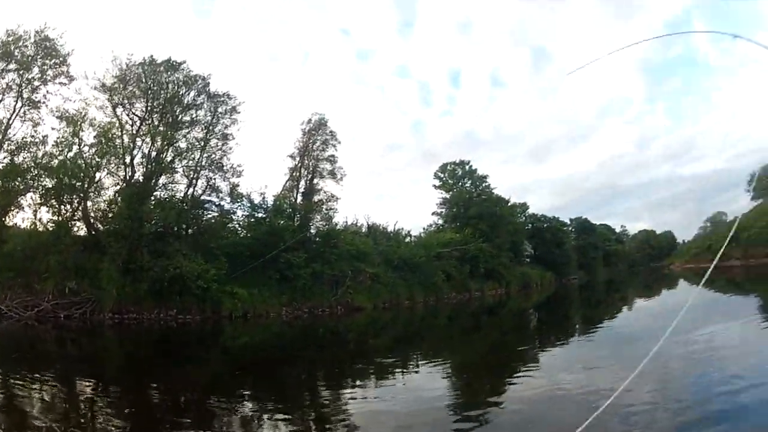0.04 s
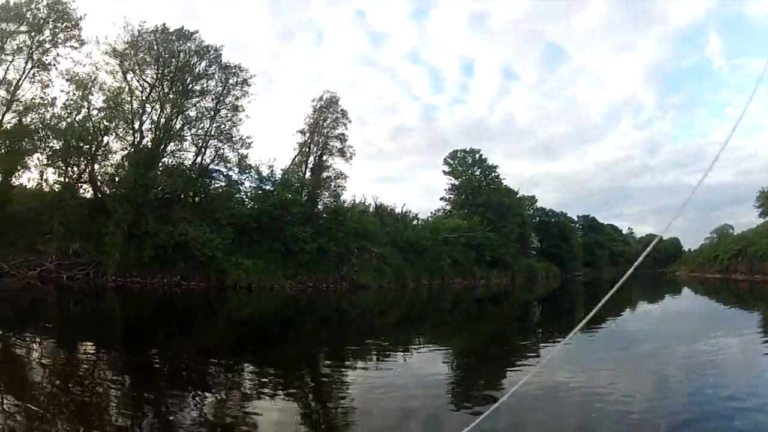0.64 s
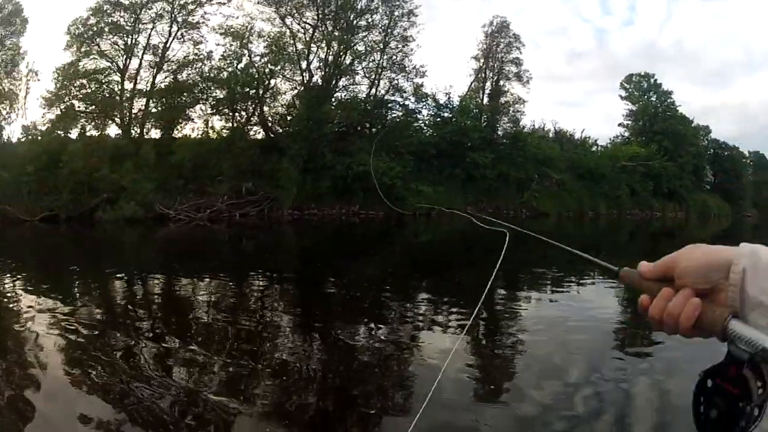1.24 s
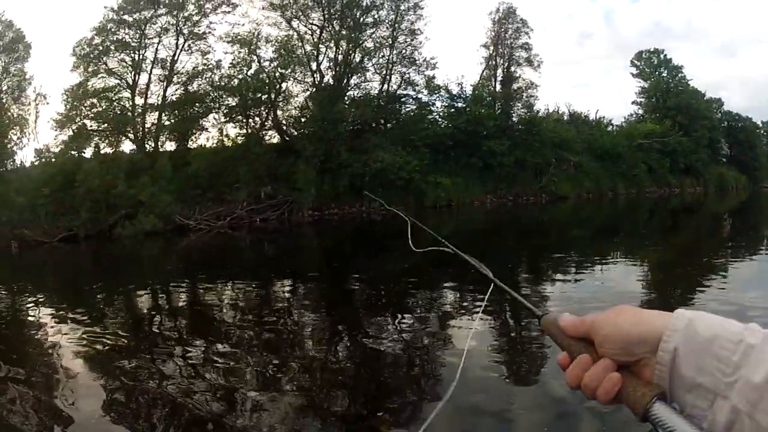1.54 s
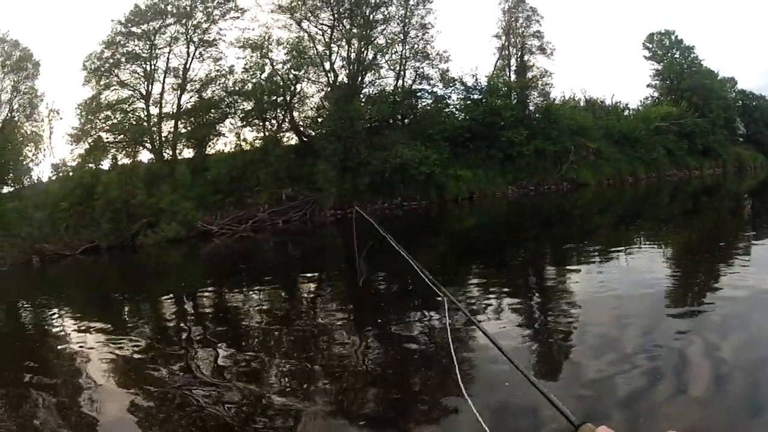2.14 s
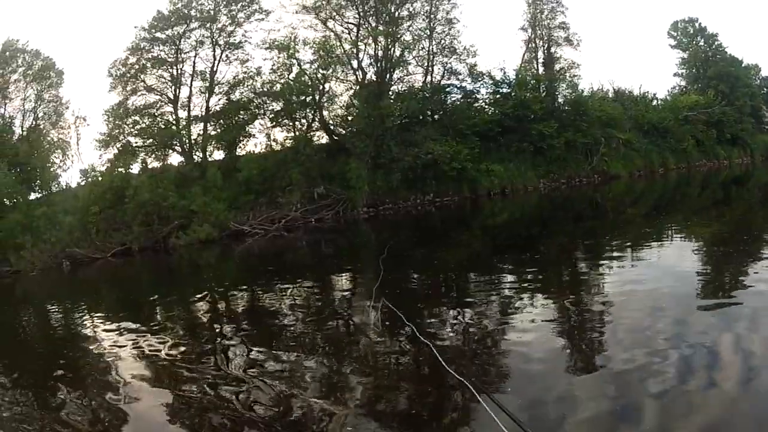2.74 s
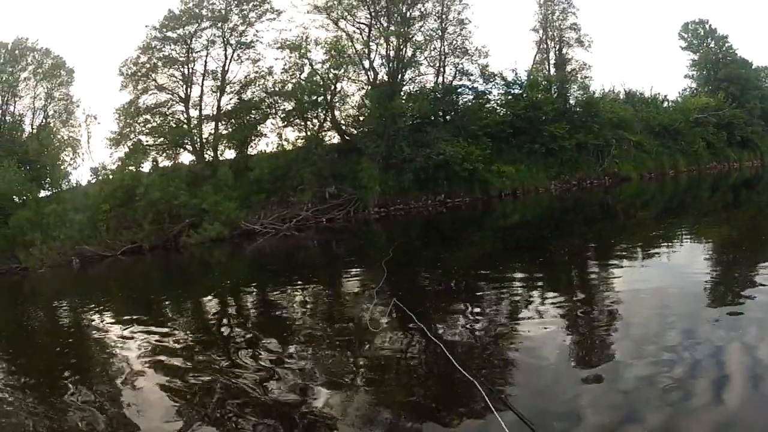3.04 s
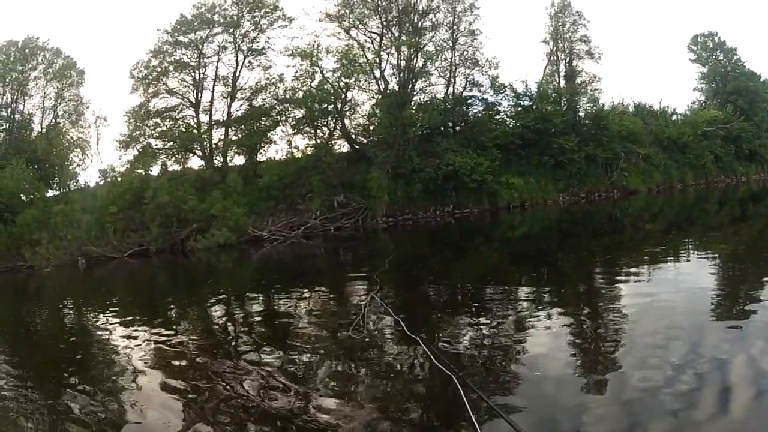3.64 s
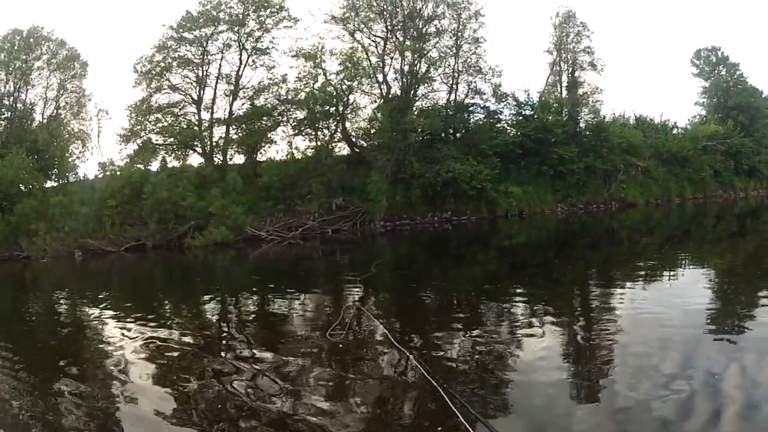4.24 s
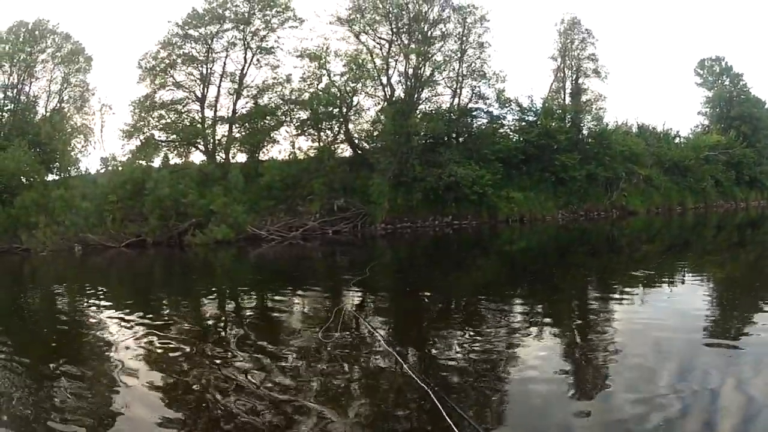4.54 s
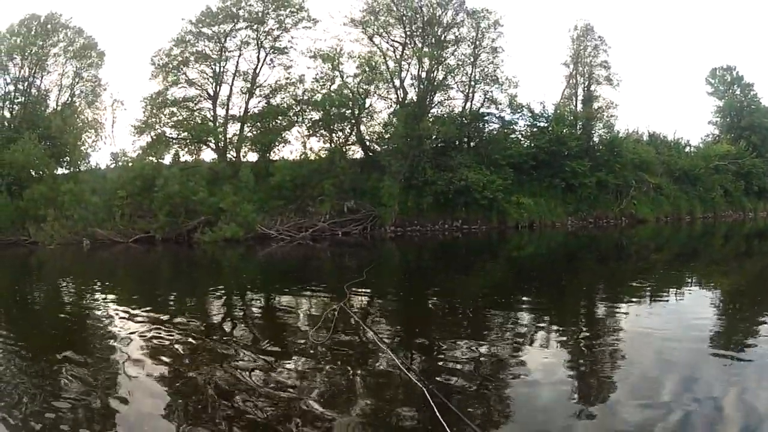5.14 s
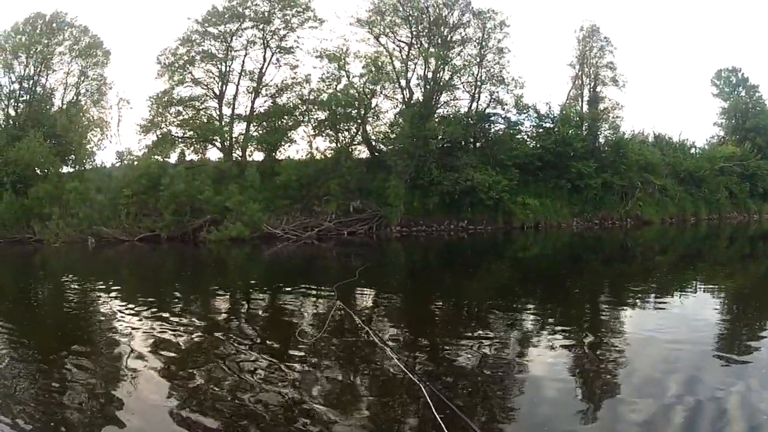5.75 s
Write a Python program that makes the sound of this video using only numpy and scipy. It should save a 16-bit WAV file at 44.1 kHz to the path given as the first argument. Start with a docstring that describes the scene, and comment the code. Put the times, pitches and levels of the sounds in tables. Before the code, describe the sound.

Close, muffled clothing rustle, ticking tackle and soft thumps die down after two seconds, leaving distant birds and low outdoor air.

```python
"""A jacket sleeve brushes a cased chest camera as an angler casts a fly line on a quiet river.
Folds and tackle tick against the case, the mount rumbles and bumps; then the arm settles.
Birds whistle from the far bank. The camera's low sampling rate mirrors a thin fizz into the treble."""
import sys
import numpy as np
from scipy import signal
from scipy.fft import rfft, irfft
from scipy.io import wavfile
from scipy.ndimage import map_coordinates

SR = 44100
rng = np.random.default_rng(int(sys.argv[2]) if len(sys.argv) > 2 else 0)


def store_wav(level_fs):
    """Save 16-bit WAV to argv[1]."""
    pcm = np.round(np.clip(np.atleast_2d(level_fs), -1, 1) * 32767)
    wavfile.write(sys.argv[1], SR, pcm.T.astype(np.int16))


N = 255339
TIME_S = np.arange(N) / SR


def sleeve(slide_db, gain_db=3, smooth_db=3.5, flutter_db=3.0, crinkle_db=-6.5):
    """Weave catches and slips over a friction hiss; tiny creases buckle and ring."""
    # hz, density_db
    cloth_spectrum = [(150, -13), (450, -12), (800, -5), (1450, -3), (1950, 2.5), (2600, -2.5),
                      (3500, -2.5), (5500, -12)]
    weave = slips(per_s=660, size_db=-1.5) + from_db(smooth_db) * rng.standard_normal(N)
    friction = unit_rms(colour(weave * from_db(flutter_db * drift(110)), cloth_spectrum))
    crinkle = unit_rms(resonate(slips(per_s=320, size_db=2.0), hz=1950, width_hz=560))
    rustle = through_case(friction + from_db(crinkle_db) * crinkle)
    return from_db(slide_db + gain_db) * unit_rms(rustle)


def arm(rest_slide_db=-79, rest_drag_db=-66.5, brake_s=0.12):
    """Slide and drag levels in dB follow arm speed; overlapping strokes add in power."""
    # start_s, rise_s, hold_s, slide_db, drag_db
    strokes = [ (-.01, 0.091, 0.17, -51, -45.5), (.25, 0.098, 0.11, -54, -51.5),
               (.46, 0.059, 0.095, -60, -50), (.61, 0.023, 0.011, -53.5, -64),
               (0.728, 0.27, .02, -42.5, -40.5), (1.06, 0.028, 0.021, -51, -56.5),
               (1.189, 0.33, 0.15, -45, -46.5), (1.58, 0.043, 0.13, -53, -42.5),
               (1.79, 0.13, 0.21, -60.5, -55.5), (2.2, .17, 0.11, -65, -61), (2.72, 0.11, 0.14, -69.5, -59),
               (3.02, 0.17, 0.17, -66, -60.5), (3.53, 0.05, 0.07, -68, -61.5),
               (3.77, 0.069, 0.083, -62.5, -58.5), (4.09, 0.086, .16, -64.5, -64),
               (4.35, 0.053, 0.16, -65, -62.5), (4.68, 0.27, 0.037, -71.5, -70.5)]
    power = from_db([[rest_slide_db], [rest_drag_db]]) ** 2
    for start_s, rise_s, hold_s, slide_db, drag_db in strokes:
        age_s = TIME_S - start_s
        rise = np.clip(age_s / rise_s, 0, 1)
        brake = np.clip(1 - (age_s - rise_s - hold_s) / brake_s, 0, 1) ** 2
        power = power + (from_db([[slide_db], [drag_db]]) * rise * brake) ** 2
    return 10 * np.log10(power)


def snaps(crease_rows, strain_s=0.0013, scrape_t60_s=0.032, crack_db=-5.5):
    """Folds, tackle and creases strain, release with a damped ring and scrape on the case."""
    # release_s, peak_db (before the case), centre_hz, width_hz
    folds_and_tackle = [ (.019, -30, 1930, 640), (.0635, -32, 1880, 1390), (.092, -26, 2030, 1600),
                        (.217, -25.5, 2070, 950), (.56, -17, 2060, 330), (.570, -16, 2160, 710),
                        (.575, -18.5, 2390, 1400), (.800, -39, 1030, 1010), (.917, -31.5, 2170, 1100),
                        (.9775, -27, 2080, 1400), (.990, -26.5, 2000, 1400), (1.0244, -23, 1930, 1300),
                        (1.045, -22.5, 1970, 1690), (1.23, -41, 2120, 1400), (1.314, -38, 1590, 1490),
                        (1.4462, -5, 1950, 850), (1.4468, -9.5, 3360, 750), (1.449, -14, 1720, 1190),
                        (1.5, -24.5, 1930, 1190), (1.5096, -19.5, 1360, 1510), (1.651, -21.5, 2900, 1100),
                        (1.672, -19, 1710, 1412), (1.7263, -30.5, 1649, 1300), (1.790, -20.5, 1500, 1970),
                        (2.028, -34.5, 1950, 800), (2.2368, -34.5, 1900, 750), (2.391, -39, 1510, 2600),
                        (2.653, -46.5, 1860, 1194), (2.785, -47, 1960, 2000), (2.966, -48, 1060, 1200),
                        (3.060, -42.5, 2100, 840), (3.252, -41.5, 1680, 1800), (3.8495, -37, 1040, 540),
                        (3.959, -42.5, 2550, 900), (4.159, -43, 950, 360), (5.7602, -40.5, 1940, 900)]
    out, lead = np.zeros(N), SR // 100
    age_s = TIME_S[:SR // 10] - TIME_S[lead]
    swell = np.exp(np.minimum(age_s, 0) / strain_s) * from_db(-60 * np.maximum(age_s, 0) / scrape_t60_s)
    for release_s, peak_db, hz, width_hz in list(folds_and_tackle) + crease_rows:
        crack = resonate(signal.unit_impulse(len(age_s), lead), hz, width_hz)
        tick = resonate(crack, hz, width_hz) + from_db(crack_db) * crack
        tick *= from_db(peak_db) / np.abs(tick).max()
        grit = resonate(rng.standard_normal(len(age_s)), hz, 2 * width_hz)
        scrape = unit_rms(resonate(grit, hz, 2 * width_hz))
        scrape_db = min(peak_db - 10.5, -25)   # cloth can scrape only so loud
        add(out, release_s + age_s[0], tick + from_db(scrape_db) * swell * scrape)
    return through_case(out)


def creases(slide_db, per_s=10, lift_db=11, spread_db=2.5, hz=1978, spread_oct=0.19, width_hz=1400):
    """Small creases give way at random, as strongly as the cloth slides; rows for snaps()."""
    scatter = rng.standard_normal((200, 2))
    times_s = np.cumsum(rng.exponential(1, len(scatter))) / per_s
    rows = []
    for release_s, (size, pitch) in zip(times_s, scatter):
        if release_s < TIME_S[-1]:
            peak_db = np.interp(release_s, TIME_S, slide_db) + lift_db + spread_db * size
            rows.append((release_s, peak_db, hz * 2 ** (spread_oct * pitch), width_hz))
    return rows


def through_case(x):
    """Contact rings the case's resonances; its wall dulls the sound."""
    # centre_hz, width_hz, lift_db
    case_modes = [(587, 40, 3), (762, 45, 7), (1000, 45, 4), (1200, 45, 5), (1370, 55, 3), (1670, 80, 6),
                  (2020, 120, 3), (2420, 160, 2), (2740, 140, 3), (3760, 200, 9), (4550, 220, 4),
                  (5250, 200, 3)]
    # hz, gain_db
    wall_response = [(100, 18.5), (2500, -3), (3050, -9), (3750, -12), (4100, -20.5), (4600, -10.5),
                     (5300, -13), (5800, -19.5)]
    for hz, width_hz, lift_db in case_modes:
        x = x + (from_db(lift_db) - 1) * resonate(x, hz, width_hz)
    return colour(x, wall_response)


def mount_bumps():
    """The mount bumps the chest; each push swells and dies in two or three swings."""
    # start_s, peak_db, pitch_hz
    pushes = [ (.162, -30, 134), (.390, -33, 154), (.561, -27.5, 368), (.574, -30, 340), (.974, -28, 164),
              (1.040, -28, 230), (1.505, -24.5, 163), (1.62, -29, 172), (1.673, -23.5, 254),
              (1.789, -23, 265), (1.794, -28, 101), (1.912, -34, 118), (2.031, -40.5, 166),
              (2.874, -35.5, 165), (3.582, -42, 99.5), (4.165, -43.5, 165)]
    out, age_s = np.zeros(N), TIME_S[:SR // 10]
    for start_s, peak_db, pitch_hz in pushes:
        half_swings = 2 * age_s * pitch_hz
        swell = half_swings * np.exp(1 - half_swings)
        add(out, start_s, -from_db(peak_db) * swell * np.sin(np.pi * half_swings))
    return out


def mount_drag(drag_db, gain_db=1.5, lumpy_db=2.5):
    """Cloth pulls on the mount and shakes the camera: a lumpy rumble."""
    # hz, density_db
    drag_spectrum = [(20, -12.5), (40, -13.5), (65, -6), (135, 1.5), (260, -5.5), (400, -13), (700, -41.5),
                     (2000, -67)]
    rumble = colour(rng.standard_normal(N), drag_spectrum) * from_db(lumpy_db * drift(50))
    return from_db(drag_db + gain_db) * unit_rms(rumble)


def birds(arch_depth=0.016, waver_depth=0.0081, shimmer_db=2.0, echo_db=-29.0, decay_db_per_s=150):
    """Pure arched whistles, unsteady with distance, echoed by the wooded bank."""
    # start_s, length_s, pitch_hz, glide_hz, level_db
    notes = [ (-.02, .065, 3950, 550, -62), (.232, .07, 3500, 190, -61), (.328, .048, 3330, -370, -63),
             (.472, .04, 3300, 350, -68), (1.868, .05, 3480, 350, -73), (1.945, .08, 2340, 160, -63),
             (1.99, .2, 2440, 10, -60.5), (2.24, .11, 2020, -120, -66), (2.36, .05, 3550, -500, -73),
             (2.472, .132, 2348, -35, -56.5), (2.88, .04, 3600, 400, -76), (3.09, .16, 2180, 70, -61),
             (3.095, .035, 3560, 350, -75), (3.315, .055, 5520, -600, -81)]
    song, waver = np.zeros(N), 1 + waver_depth * drift(160)
    for start_s, length_s, pitch_hz, glide_hz, level_db in notes:
        on = (TIME_S > start_s) & (TIME_S < start_s + length_s)
        along = (TIME_S[on] - start_s) / length_s
        arch = 1 - arch_depth * (2 * along - 1) ** 2
        hz = (pitch_hz + glide_hz * (along - .5)) * arch * waver[on]
        swell = np.sqrt(2 * np.abs(np.sin(np.pi * along ** 1.1)))
        song[on] += from_db(level_db) * swell * np.sin(2 * np.pi * np.cumsum(hz) / SR)
    age_s = TIME_S[:SR // 2]
    tail = rng.standard_normal(len(age_s)) * from_db(-decay_db_per_s * age_s)
    echo = signal.fftconvolve(song, unit_rms(tail) / np.sqrt(len(tail)))[:N]
    return song * from_db(shimmer_db * drift(60)) + from_db(echo_db) * echo


def river_air(level_db=-61):
    """Steady low outdoor hush."""
    # hz, density_db
    air_spectrum = [(20, -5.5), (70, 1.5), (200, -4.5), (500, -13.5), (1000, -21), (2000, -25.5),
                    (3000, -24.5), (5200, -28), (5900, -38)]
    return from_db(level_db) * unit_rms(colour(rng.standard_normal(N), air_spectrum))


def channel_hiss(level_db=-77.5):
    """Faint hiss, independent in each channel."""
    # hz, density_db
    hiss_spectrum = [(18, -36), (30, -4), (71, 0.5), (204, -3), (338, -3.5), (912, -18.5), (4550, -13.5),
                     (5310, -14.5), (5800, -18.5), (7540, -65), (12800, -120)]
    channels = [unit_rms(colour(noise, hiss_spectrum)) for noise in rng.standard_normal((2, N))]
    return from_db(level_db) * np.array(channels)


def from_db(db):
    """Decibels to gain."""
    return 10 ** (np.asarray(db) / 20)


def unit_rms(x):
    """Scale to rms 1."""
    return x / np.sqrt(np.mean(x ** 2) + 1e-20)


def drift(knots_per_s):
    """Random wander; rms 1."""
    knots = rng.standard_normal(8000)
    return unit_rms(map_coordinates(knots, [TIME_S * knots_per_s], order=1, mode="wrap"))


def slips(per_s, size_db):
    """Random impulses, sizes spread over three steps of size_db; rms 1."""
    sizes = from_db(size_db * np.minimum(rng.exponential(1, N), 3))
    signs = rng.choice([-1, 1], N)
    return unit_rms(sizes * signs * (rng.random(N) < per_s / SR))


def colour(x, spectrum, size=8192):
    """Minimum-phase filter from rows of hz, gain_db."""
    hz, gain_db = np.transpose(spectrum)
    grid_hz = np.maximum(np.fft.rfftfreq(size, 1 / SR), 1)
    gain = from_db(np.interp(np.log(grid_hz), np.log(hz), gain_db))
    cepstrum = irfft(np.log(gain))
    cepstrum[1:size // 2] *= 2
    cepstrum[size // 2 + 1:] = 0
    impulse = irfft(np.exp(rfft(cepstrum)))[:size // 2]
    return signal.oaconvolve(x, impulse)[:N]


def resonate(x, hz, width_hz):
    """Two-pole resonance, peak gain 1."""
    return signal.lfilter(*signal.iirpeak(hz, hz / width_hz, fs=SR), x + 1e-18)


def add(track, start_s, sound):
    """Mix a short sound in at start_s."""
    start = max(round(start_s * SR), 0)
    track[start:start + len(sound)] += sound[:max(N - start, 0)]


def scene():
    """All sources reach one microphone; only the hiss is stereo."""
    slide_db, drag_db = arm()
    background = river_air() + channel_hiss()
    mono = sleeve(slide_db) + mount_drag(drag_db) + mount_bumps() + birds() + snaps(creases(slide_db))
    return mono + background


def record(dry, band_hz=5850, sample_hz=12000, output_hz=48000, cutoff_hz=15600):
    """Slow sample-and-hold mirrors the sound on both sides of the sampling rate."""
    narrow = signal.sosfilt(signal.ellip(10, .2, 70, band_hz, fs=SR, output="sos"), dry)
    mirrored = narrow * (1 + 2 * np.cos(2 * np.pi * sample_hz * TIME_S))
    hz = np.fft.rfftfreq(N, 1 / SR)
    hold_droop = np.sinc(hz / sample_hz) / np.sinc(hz / output_hz)
    held = irfft(rfft(mirrored) * hold_droop, N)
    return signal.sosfilt(signal.ellip(10, .2, 70, cutoff_hz, fs=SR, output="sos"), held)


dry = scene()
out = record(dry)
store_wav(out)
```